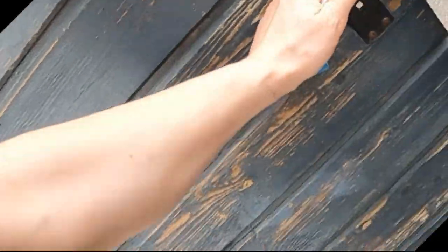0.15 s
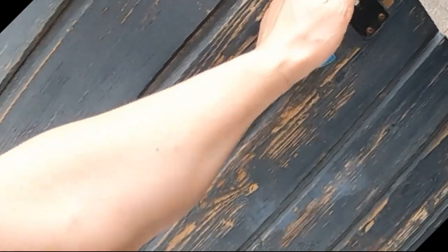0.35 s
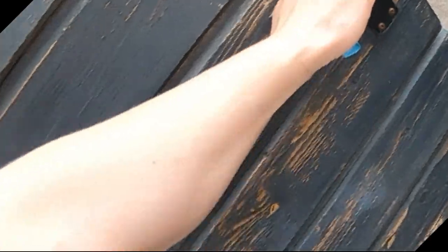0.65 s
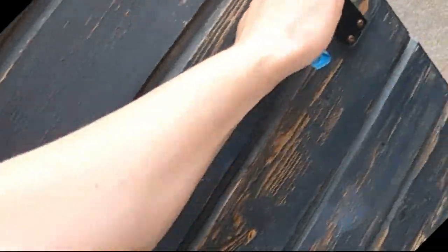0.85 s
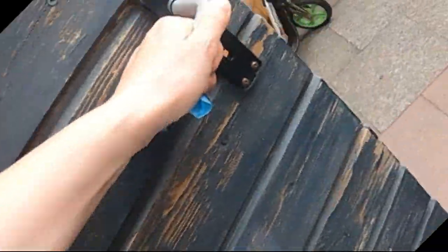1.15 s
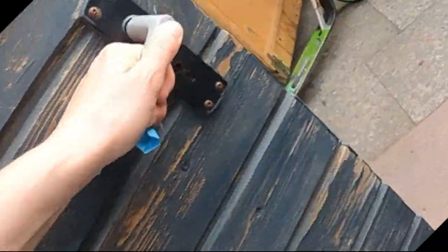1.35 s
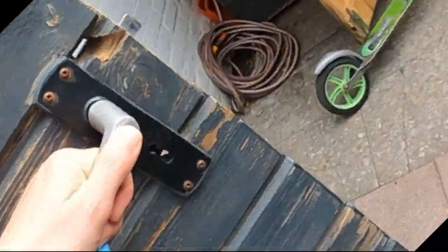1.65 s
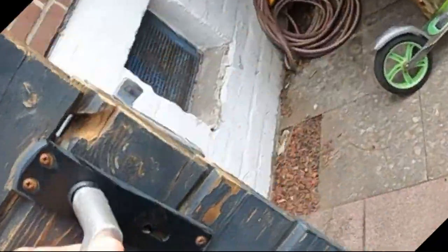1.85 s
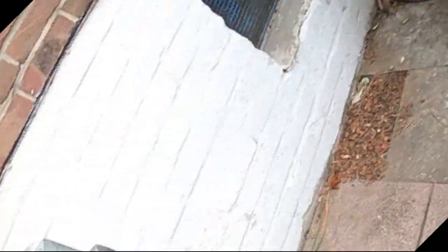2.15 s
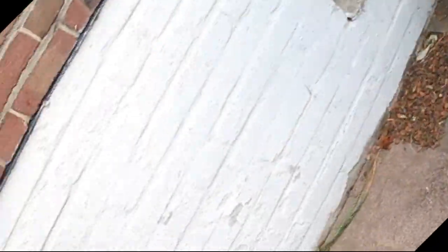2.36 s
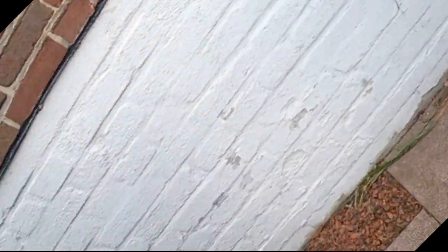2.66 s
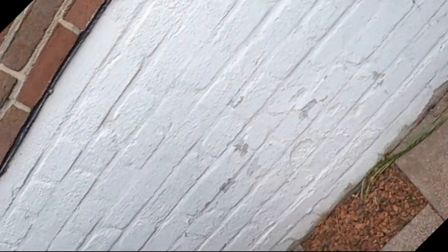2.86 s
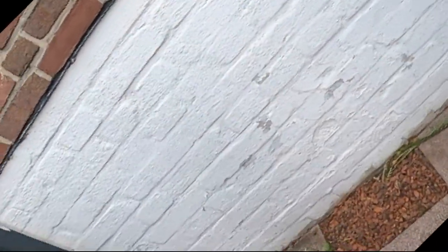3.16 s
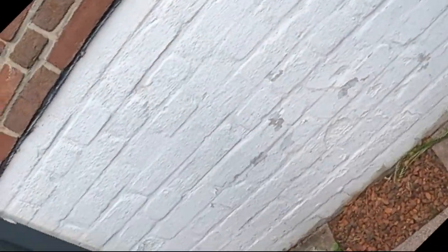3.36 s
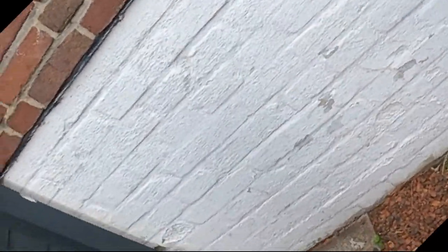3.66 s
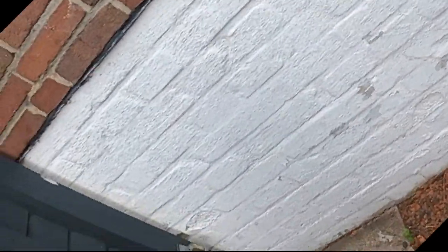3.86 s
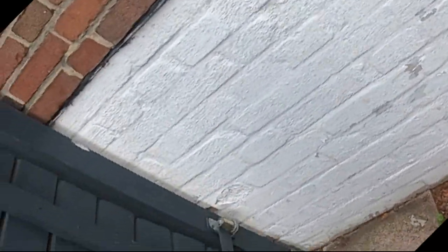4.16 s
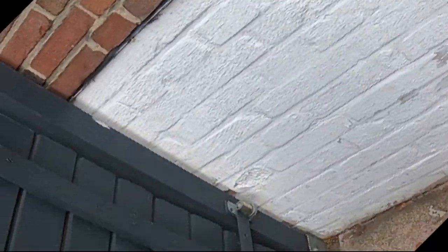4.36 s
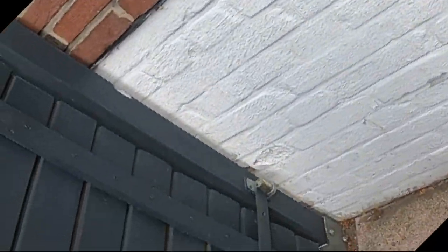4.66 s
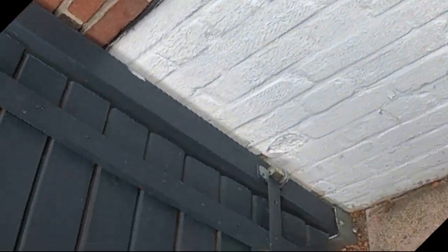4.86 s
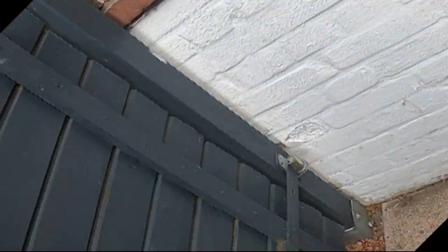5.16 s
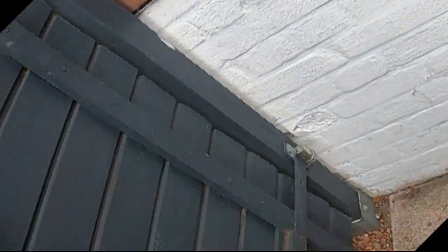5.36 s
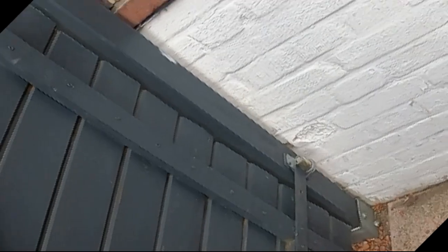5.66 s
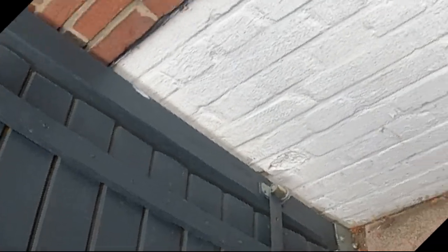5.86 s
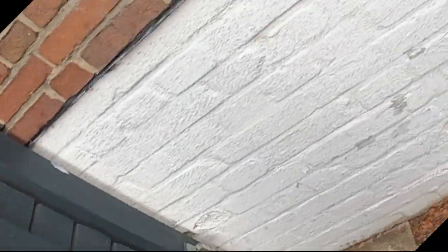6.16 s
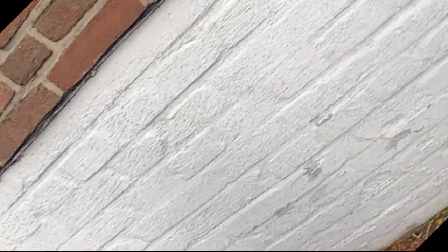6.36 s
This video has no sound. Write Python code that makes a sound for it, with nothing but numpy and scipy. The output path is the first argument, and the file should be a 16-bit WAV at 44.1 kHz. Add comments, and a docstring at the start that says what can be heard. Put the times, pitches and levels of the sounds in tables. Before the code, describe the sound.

Outdoors beside a brick wall, a loose metal latch clatters on a wooden door, pauses with light rubbing and a ticking creak, then clicks hard as the door drags free. Afterwards come isolated clicks, a short low groan, sharp knocks and boomy thumps, with the door rocking in a fading row of bumps. Faint bird chirps and soft low air noise lie behind this close recording.

```python
"""A hand works the lever latch of a wooden shed door close by: knocks ring the lock case over dull panel modes.
The handle creaks by stick-slip, then the latch snaps and the door scrapes free as filtered contact noise.
Later, among more knocks, a bird calls in two gliding voices and the door rocks on its hinges, ever weaker.
Throughout, small birds chirp as swept tones over the noise of garden air; a brick wall returns short echoes."""
import sys
import numpy as np
from scipy import signal
from scipy.io import wavfile

SR = 44100
rng = np.random.default_rng(int(sys.argv[2]) if len(sys.argv) > 2 else 0)


def wrap_up_sound(samples):
    """Save the sound to the file named by the first command line argument, as 16-bit audio."""
    columns = np.atleast_2d(samples).T
    # keep every value between -1 and 1, then stretch to whole-number steps
    tamed = np.clip(columns, -1, 1)
    steps = np.round(tamed * 32767).astype(np.int16)
    wavfile.write(sys.argv[1], SR, steps)


N = 287081
TIME = np.arange(N) / SR  # the whole scene [s]
RING = np.arange(SR // 2) / SR  # half a second for one impact or echo response [s]

# resonances of the lock case and handle plate: (frequency [Hz], width [Hz], gain over broad response [dB])
LOCK_MODES = [(507, 8.7, 5), (585, 15, 2), (749.2, 13, 7), (849, 30, 3), (1220, 40, 4.5), (1310, 21, 2),
              (1420, 27, 5.5), (2000, 21, 2.5), (2136, 42, 5), (2315, 49, 5), (3300, 35, 3), (3925, 16, 4),
              (4215, 52, 4), (4630, 40, 5), (7600, 170, 4), (8355, 270, 8.5)]
# bright rubs of hand and door edge:
# (peak time [s], rise time over 20 dB [s], fall time over 20 dB [s], relative level [dB])
RUB_STROKES = [(.15, .9, 0.28, -62), (.295, 0.355, 0.03, -55.5), (.5, 0.3, 0.37, -60),
               (.71, 0.041, 0.075, -45), (1.1, 1, .6, -66), (1.655, 0.12, 0.043, -49.5),
               (1.94, 0.19, 0.56, -45), (2.06, 0.196, .2, -47.5), (2.17, 0.56, 0.073, -47.5),
               (2.235, 0.12, 0.032, -46.5), (2.55, 0.19, 0.21, -60.5), (3.03, 0.69, 0.052, -62.5),
               (3.6, 0.51, 0.093, -66), (3.88, 0.24, 0.085, -53.5), (4.0, 0.07, 0.18, -47),
               (4.06, 0.051, 0.055, -50), (4.21, 0.16, 0.18, -50.5), (5.65, 0.61, 0.64, -65),
               (5.91, 0.089, 0.066, -54.5)]
# broad response to rubbing: (frequency [Hz], relative level [dB])
RUB_RESPONSE = [(300, -9.5), (1300, -8.5), (2900, 1), (4500, -1.5), (6500, -7), (8500, -12.5),
                (10000, -14.5), (12000, -22.5), (16000, -37.5)]


def knocks(level_db=-10, chatter_db=2.0, chatter_per_s=900, tail_db=-26, tail_t60=0.24, ring_width_hz=80, rise_s=0.0028):
    """Repeated impact: each knock builds for a moment while the loose latch bounces in its case."""
    # wooden knocks with latch chatter: (time [s], bite level [dB], body level [dB], sparkle level [dB],
    # ring frequency [Hz], decay T60 [s], ring gain [dB]); the first three levels are relative
    blows = [(0.0014, -36, -27.5, -56, 568, 0.04, 20), (0.104, -30, -27, -71, 1940, 0.037, 16),
             (0.1265, -48, -35, -85, 475, 0.045, 23), (0.139, -38, -26.5, -90, 1360, 0.028, 6),
             (0.169, -45.5, -35.5, -85, 800, 0.18, 3), (0.466, -63, -37.5, -95, 660, 0.26, 15.5),
             (1.9481, -26, -31, -59, 2570, 0.12, 4), (2.106, -27, -23, -43, 1260, 0.087, 16),
             (2.114, -26, -19.5, -35.5, 770, 0.045, 16), (2.124, -32, -22.5, -56, 508, 0.075, 15),
             (2.13, -34, -22.5, -41, 326, 0.11, 22), (2.7425, -38.5, -32.5, -61.5, 750, 0.11, 21),
             (3.062, -36, -27, -45.5, 736, .096, 13), (3.4796, -34, -19, -76, 750, 0.048, 7),
             (3.4835, -28.5, -35, -72, 2220, 0.019, 21), (3.498, -45, -28, -76, 1200, 0.037, 10),
             (4.056, -32, -45, -49, 2900, 0.074, 22.5), (4.0714, -34, -36.5, -68, 2720, 0.11, 12.5),
             (4.187, -35, -31.5, -85, 514.4, 0.051, 7), (4.22, -33.5, -34, -63, 452, 0.0395, 12),
             (4.3803, -17, -23, -34.5, 4200, 0.035, 13), (4.7124, -46, -36.5, -80.5, 664, 0.1, 9.5),
             (5.0568, -29, -25.5, -39, 3010, 0.095, 12), (5.087, -38.5, -33, -71, 974, 0.22, 9),
             (5.141, -39.5, -30, -57, 379.5, 0.064, 15), (5.197, -37.5, -30.5, -73, 446, 0.045, 16),
             (5.302, -24.5, -28.5, -33.5, 2994, 0.039, -1), (5.329, -27, -29.5, -42.5, 920, 0.051, 10),
             (5.345, -39, -35, -66, 418, 0.14, 8), (5.455, -48.5, -39.5, -72, 463, 0.048, 9),
             (5.489, -38.5, -31, -75, 524, 0.051, 16), (5.7636, -38, -23, -50, 518, 0.18, -6),
             (5.7796, -24, -14, -42, 1333, 0.055, 11.5), (5.7817, -13, -21, -58, 2296, 0.021, 17),
             (5.8111, -24, -24.5, -35.5, 2120, 0.059, 3), (6.1026, -43, -36, -59.5, 840, 0.15, -1)]
    # broad response to knocking: (frequency [Hz], relative level [dB])
    response = [(300, -2.5), (700, -5), (1600, -6.5), (3000, 1.5), (6000, -8), (9500, -6), (12000, -20.5),
                (16000, -48.5)]
    out = np.zeros(N)
    for s, bite, body, sparkle, hz, t60, ring_db in blows:
        decay = dying(t60) + amp(tail_db) * dying(tail_t60)
        swell = (1 - np.exp(-RING / rise_s)) * decay
        force = swell * amp(chatter_db * drift(len(RING), chatter_per_s))
        # chatter leaves the energy of the blow unchanged
        force *= np.linalg.norm(swell) / np.linalg.norm(force) / swell.max()
        modes = LOCK_MODES + [(hz, ring_width_hz, ring_db)]
        add(out, s, strike(force, response, (bite, body, sparkle), modes))
    return amp(level_db) * out


def clicks(level_db=-2, tail_db=-31, tail_t60=0.11, ring_width_hz=600, ring_db=10, below_ring=0.77):
    """Impulsive excitation: metal snaps on metal with a faint shiver; each contact point has its own ring."""
    # sharp metal clicks: (time [s], relative bite level [dB], relative body level [dB],
    # relative sparkle level [dB], ring frequency [Hz], decay T60 [s])
    snaps = [(0.038, -28, -62, -57, 2600, 0.036), (0.6417, -38.5, -55, -50.5, 2500, 0.014),
             (0.6913, -34, -60, -43, 4300, 0.012), (0.9441, -37.5, -47, -47, 4300, 0.043),
             (1.7491, -42, -42.5, -47, 3500, 0.029), (2.0222, -14.5, -19, -14.5, 2650, 0.0081),
             (2.0477, -18.5, -28.5, -24, 2850, 0.0097), (2.1536, -19, -46, -45, 4370, 0.0062),
             (2.1917, -34.5, -36, -38, 1320, 0.03), (2.2563, -48, -32, -52, 930, 0.015),
             (2.435, -41, -61, -55, 2930, 0.015), (2.4542, -41.5, -60, -54, 3170, 0.055),
             (3.7288, -15, -59.5, -30, 2700, 0.0062), (3.7331, -29, -64, -39, 2600, 0.037),
             (3.8122, -41.5, -48.5, -74, 1366, 0.14), (4.452, -39.5, -42, -53.5, 2310, 0.023),
             (5.1819, -44.5, -41, -64, 4022, 0.028), (5.7025, -42, -45.5, -54, 3330, 0.052),
             (6.433, -46, -52.5, -60.5, 3550, 0.049)]
    # broad response to clicking: (frequency [Hz], relative level [dB])
    response = [(300, -7.5), (1000, -2), (2800, 7), (5000, 2), (9500, -9.5), (11200, -21.5), (12200, -18),
                (16000, -48.5)]
    out = np.zeros(N)
    for s, bite, body, sparkle, hz, t60 in snaps:
        force = dying(t60) + amp(tail_db) * dying(tail_t60)
        modes = LOCK_MODES + [(hz, ring_width_hz, ring_db)]
        lowest_hz = np.clip(below_ring * hz, 1800, 5000)
        sound = strike(force, response, (bite, body, sparkle), modes, snap=0.95, bite_from_hz=lowest_hz)
        add(out, s, sound)
    return amp(level_db) * out


def strike(force, response, levels_db, modes, snap=0., bite_from_hz=1800, tilt_share=0.42, neutral_db=13):
    """Source-filter impact: snap and contact chatter ring the lock; hardness sets bite, body and sparkle."""
    contact = force * rng.standard_normal(len(force))
    contact[0] += snap * np.linalg.norm(force)
    bite, _, sparkle = levels_db
    # a soft blow falls off faster towards the treble, in dB an octave above 1500 Hz
    tilt = tilt_share * (sparkle - bite + neutral_db)
    tilted = [(hz, db + tilt * np.log2(max(hz / 1500, 1))) for hz, db in response]
    ring = colour(contact, tilted, modes)
    bands = [(bite_from_hz, 6000), (280, 1800), (6000, 15000)]  # bite, body, sparkle [Hz]
    mixed = sum(amp(db) * unit(band(ring, *b)) for db, b in zip(levels_db, bands))
    return np.sqrt(np.mean(force ** 2)) * mixed


def thumps(leaf_db=-3, plank_db=-4, leaf_t60=0.29, plank_share=0.71):
    """Modal superposition: the whole leaf booms; the planks die sooner."""
    # dull thumps of the leaf: (time [s], relative boom level [dB], relative plank level [dB],
    # nominal boom frequency [Hz])
    blows = [(0.001, -27.5, -28.5, 90.3), (0.038, -24.5, -34.5, 87.6), (0.126, -35, -29, 104.7),
             (0.312, -34.5, -46.5, 100), (0.505, -41.5, -44.5, 104.3), (0.724, -38, -41.5, 104.3),
             (0.774, -35.5, -62, 95), (0.945, -38, -44.5, 95.8), (0.992, -36, -56, 92),
             (1.461, -54, -47, 68), (1.629, -41, -39.5, 67.4), (1.76, -41.5, -47.5, 73),
             (1.985, -51, -45.5, 98.5), (2.122, -55, -34.5, 66.4), (2.659, -65, -41, 67.5),
             (3.073, -49, -35.5, 73.6), (3.479, -29.5, -29.5, 79.2), (3.541, -43.5, -34.5, 92),
             (3.828, -32, -33, 75), (4.196, -35, -31.5, 75), (4.383, -25.5, -33, 78.1),
             (5.055, -32, -30, 66.3), (5.141, -44, -33, 89.4), (5.494, -42, -40, 92),
             (5.784, -26, -30, 81.4), (5.826, -26, -47, 88), (6.066, -35.5, -50, 95.9),
             (6.104, -34, -40, 82)]
    # flexing of the leaf: (multiple of the boom frequency [1], relative level [dB])
    leaf = [(.64, -11), (1.002, 1), (1.37, -14)]
    # plank modes: (nominal frequency [Hz], relative level [dB])
    planks = [(146, -0.5), (188, 2), (232, 3.5), (252, 2.5), (283, 3.5), (345, -6), (430, -7)]
    out = np.zeros(N)
    multiples, leaf_modes_db = np.transpose(leaf)
    plank_hz, plank_modes_db = np.transpose(planks)
    for s, boom, plank, hz in blows + rocking():
        flexing = wood(hz * multiples, leaf_modes_db, leaf_t60, rise=0.0032, detune=0.067)
        add(out, s, amp(boom + leaf_db) * flexing)
        plank_ring = wood(plank_hz, plank_modes_db, leaf_t60 * plank_share, rise=0.0043, detune=0.06)
        add(out, s, amp(plank + plank_db) * plank_ring)
    return out


def rocking(count=4, start_s=5.134, period_s=.101, boom_hz=97.2, boom_db=-28, plank_db=-37, loss_db=0.9):
    """Damped oscillation: the open door rocks on its hinges in evenly spaced, weakening bumps."""
    return [(start_s + k * period_s, boom_db - k * loss_db, plank_db - k * loss_db, boom_hz)
            for k in range(count)]


def wood(hz, db, t60, rise, detune):
    """Damped low modes of the door, pushed from rest, a little different at every point of impact."""
    hz = hz * (1 + detune * rng.uniform(-0.92, 1, len(hz)))
    ring = amp(db) @ np.sin(2 * np.pi * hz[:, None] * RING)
    swell = (1 - np.exp(-RING / rise)) * dying(t60)
    return unit(ring * swell) * np.sqrt(np.mean(swell ** 2)) / swell.max()


def creak(level_db=-3, uneven_db=1.2, slip_rise_s=0.0009):
    """Stick-slip: the spindle judders quickly as the lever starts to turn, then sticks and slips more slowly."""
    # single slips: (time [s], relative level [dB])
    slow_slips = [(0.977, -46), (0.987, -48), (1.012, -54), (1.106, -49), (1.126, -37), (1.135, -42),
                  (1.162, -43), (1.192, -45.5), (1.218, -47.5), (1.243, -51), (1.264, -49), (1.292, -49)]
    # short ring of the spindle: (nominal frequency [Hz], relative level [dB])
    spindle = [(480, -5.5), (950, -11), (1950, -1), (2350, 0), (3800, -12.5), (5200, -11)]
    judder_start_s, judder_length_s, judder_per_s, judder_db = .79, .09, 127, -50
    out = np.zeros(N)
    hz, db = np.transpose(spindle)
    t = RING[:SR // 50]
    swell = t / slip_rise_s * np.exp(1 - t / slip_rise_s)
    judder = [(judder_start_s + s, judder_db) for s in np.arange(0, judder_length_s, 1 / judder_per_s)]
    for s, slip_db in judder + slow_slips:
        slip_hz = hz * rng.uniform(0.88, 1.1, len(hz))
        ring = amp(db) @ np.sin(2 * np.pi * np.outer(slip_hz, t))
        gain = amp(slip_db + level_db + uneven_db * rng.standard_normal())
        add(out, s, gain * unit(ring) * swell)
    return out


def handling(rub_db=-2.0, shuffle_db=-1, tremble_db=-3, scrape_tremble_db=-3.5, sway_db=1):
    """Sliding friction: rubs hiss, scrapes ring lock and planks, and the door trembles and sways in the hand."""
    # force of the hand on the door: (time [s], relative level [dB])
    push_points = [(0, -35.5), (.35, -51), (1.0, -52), (1.35, -57), (1.6, -49), (1.9, -64), (2.2, -47.5),
                   (2.5, -73.5), (2.87, -59), (3.03, -48), (4.35, -49), (4.7, -59), (5.02, -65.5),
                   (5.08, -38.5), (5.4, -48.5), (5.8, -49.5), (6.51, -64)]
    # dull scrapes of the moving door and of shuffling:
    # (peak time [s], rise time over 20 dB [s], fall time over 20 dB [s], relative level [dB])
    scrape_strokes = [(.02, 0.28, 0.27, -43.5), (.7, 0.2, 0.41, -55), (1.3, 0.99, 1, -64.5),
                      (1.62, 0.1, 1, -57), (2.1, 0.71, 0.54, -50), (2.55, .4, 1, -61.5),
                      (3.05, 0.44, 0.33, -45.5), (3.6, 0.93, 0.46, -52.5), (4.28, 0.55, 0.41, -56.5),
                      (4.75, 0.33, 0.55, -63.5), (5.33, 0.27, 0.55, -56.5), (5.75, 0.23, 0.35, -51),
                      (6.45, 0.52, 0.77, -62)]
    # broad responses: (frequency [Hz], relative level [dB])
    shuffle_response = [(200, -17), (430, -1), (700, -5.5), (1000, 0.5), (1600, -6.5), (2400, -7),
                        (3300, -14.5), (7000, -33), (12000, -78.5)]
    tremble_response = [(90, -30), (150, -2), (195, 0), (240, 0.5), (300, -6.5), (400, -12.5), (700, -19),
                        (1500, -68.5)]
    sway_response = [(12, -6), (22, -7.5), (34, 8.5), (55, -1), (88, 5.5), (125, -5), (200, -29),
                     (500, -90.5)]
    push = amp(np.interp(TIME, *np.transpose(push_points)))
    scrape = strokes(scrape_strokes)
    shake = np.hypot(amp(tremble_db) * push, amp(scrape_tremble_db) * scrape)
    rub = friction(strokes(RUB_STROKES), RUB_RESPONSE, grain_db=2.5, grains_per_s=260, modes=LOCK_MODES)
    shuffle = friction(scrape, shuffle_response, grain_db=3.0, grains_per_s=190, modes=LOCK_MODES)
    tremble = friction(shake, tremble_response, grain_db=4.0, grains_per_s=59)
    sway = friction(push, sway_response, grain_db=1, grains_per_s=63)
    return amp(rub_db) * rub + amp(shuffle_db) * shuffle + tremble + amp(sway_db) * sway


def friction(strength, response, grain_db, grains_per_s, modes=()):
    """Random excitation: uneven grains of contact ring a surface, following the strength of the stroke."""
    grains = rng.standard_normal(N) * amp(grain_db * drift(N, grains_per_s))
    return unit(colour(grains, response, modes)) * strength


def strokes(rows, range_db=20):
    """Contact strength: each stroke changes by range_db per rise or fall time, and powers add."""
    power = np.zeros(N)
    for s, rise, fall, db in rows:
        steps_from_peak = np.maximum((s - TIME) / max(rise, .01), (TIME - s) / max(fall, .01))
        power += amp(db - range_db * steps_from_peak) ** 2
    return np.sqrt(power)


def grit(level_db=-6, ticks_per_s=110, spread_db=13):
    """Sparse impulses: specks of rust and paint snap under each rub and tick the lock plate."""
    struck = rng.random(N) < ticks_per_s / SR
    ticks = struck * rng.choice([-1., 1.], N) * amp(spread_db * rng.random(N))
    return amp(level_db) * unit(colour(ticks, RUB_RESPONSE, LOCK_MODES)) * strokes(RUB_STROKES)


def squeaks(level_db=0):
    """Resonant friction: rubbing edges and hinges feed one narrow resonance for the length of a stroke."""
    # faint squeaks and groans: (time [s], length [s], centre frequency [Hz], width [Hz], level [dB])
    tones = [(0.293, 0.24, 2120, 130, -65.5), (3.795, .135, 257, 106, -37), (2.726, 0.063, 710, 159, -54.5),
             (2.848, 0.59, 247, 40, -49), (3.099, 0.5, 2460, 200, -63), (3.991, 0.063, 2800, 500, -50.5),
             (4.268, 0.13, 1500, 800, -53.5), (5.531, 0.12, 300, 70, -51.5),
             (6.259, 0.091, 1460, 900, -58.5)]
    out = np.zeros(N)
    for s, length, hz, width, db in tones:
        noise = rng.standard_normal(SR)
        tone = band(noise, hz - width / 2, hz + width / 2)[-int(length * SR):]  # the settled end
        add(out, s, amp(db + level_db) * unit(tone) * signal.windows.tukey(len(tone), .6))
    return out


def birds(chirps_db=-2, call_db=-1, overtone_db=-30, chirp_waver=0.039, trill_waver=0.071, rasp_hz=960):
    """Frequency modulation: rising, falling, arched and buzzing far chirps, and a louder two-voice call."""
    # chirps of four kinds: (time [s], length [s], middle frequency [Hz], relative level [dB])
    rising = [(.065, 0.047, 3624, -51.5), (.118, 0.046, 4230, -50.5), (.89, 0.052, 3280, -60),
              (.93, 0.067, 4023, -50.5), (1.76, 0.085, 3800, -55.5), (2.385, 0.088, 2405, -59.5),
              (2.57, 0.08, 3910, -56.5), (3.343, 0.1006, 3880, -60), (5.0, 0.087, 3690, -58.5)]
    falling = [(.588, 0.047, 3820, -60), (1.271, 0.045, 3580, -59.5), (1.354, 0.035, 3800, -58),
               (1.445, 0.055, 3716, -60.5), (4.615, 0.038, 4250, -58)]
    arched = [(4.566, 0.062, 4860, -58.5), (4.68, 0.0534, 3540, -59)]
    buzzing = [(1.102, 0.0295, 5367, -64), (1.145, .06, 5360, -63.5)]
    # the nearest bird sings with both sides of its syrinx: (time [s], frequency [Hz], relative level [dB])
    main_voice = [(4.835, 2770, -61.5), (4.871, 3010, -45), (4.883, 3830, -49), (4.888, 4680, -36),
                  (4.897, 4680, -46), (4.900, 4000, -49), (4.909, 4030, -37), (4.914, 3150, -40.5),
                  (4.924, 2870, -44), (4.934, 3560, -35.5), (4.943, 3500, -41), (4.953, 3110, -38),
                  (4.966, 2900, -46), (4.980, 2660, -66)]
    upper_voice = [(4.835, 5550, -62), (4.857, 5680, -55.5), (4.877, 6020, -64)]
    out = np.zeros(N)
    # start and end pitch are multiples of the middle pitch
    kinds = ((rising, (0.93, 1.2), chirp_waver), (falling, (1.13, 0.85), chirp_waver),
             (arched, (.92, 1), chirp_waver), (buzzing, (1.2, 1), trill_waver))
    for chirps, (first, last), waver in kinds:
        for s, length, middle_hz, db in chirps:
            u = np.linspace(0, 1, int(length * SR))
            parabola = np.polyfit([0, .5, 1], [first, 1, last], 2)
            hz = middle_hz * np.polyval(parabola, u)
            note = whistle(hz, waver, flutter_db=1.5) * signal.windows.tukey(len(u), .5)
            add(out, s, amp(db + chirps_db) * note)
    for contour, waver, rasp_depth in ((main_voice, .028, .2), (upper_voice, .018, .7)):
        s, hz, db = np.transpose(contour)
        t = np.arange(s[0], s[-1], 1 / SR)
        hz = np.interp(t, s, hz)
        voice = whistle(hz, waver, flutter_db=2.5)
        overtone = whistle(2 * hz, waver, flutter_db=2.5)
        rasp = 1 + rasp_depth * np.sin(2 * np.pi * rasp_hz * t)
        level = amp(np.interp(t, s, db) + call_db)
        add(out, s[0], level * rasp * (voice + amp(overtone_db) * overtone))
    return out


def whistle(hz, waver, flutter_db):
    """Phase integration: a gliding note, slightly rasping from random pitch and level modulation."""
    phase = 2 * np.pi * np.cumsum(hz * (1 + waver * drift(len(hz), 900))) / SR
    return unit(np.sin(phase) * amp(flutter_db * drift(len(hz), 225)))


def echoes(x, t60, delay, top_hz):
    """Convolution with sparse, decaying reflections from walls and paving."""
    reflected = (rng.random(len(RING)) < 2000 / SR) * (RING > delay)
    taps = rng.choice([-1., 1.], len(RING)) * reflected * dying(t60)
    taps = band(taps, 160, top_hz)
    return signal.fftconvolve(x, taps / np.linalg.norm(taps))[:N]


def garden_air(level_db=-64):
    """Stationary filtered noise: the steady air of the garden."""
    # spectrum of the air: (frequency [Hz], relative level [dB])
    spectrum = [(18, -29), (30, -3.5), (81, 1.5), (134, 2.5), (245, -4.5), (355, -14.5), (616, -26),
                (913, -33), (1010, -10), (1540, -21), (3980, -20.5), (8520, -29.5), (16000, -63.5)]
    return amp(level_db) * unit(colour(rng.standard_normal(N), spectrum))


def amp(db):
    """Logarithmic level: decibels to gain."""
    return 10 ** (np.asarray(db) / 20)


def unit(x):
    """Normalization by mean power: scales to rms 1."""
    return x / np.sqrt(np.mean(x ** 2) + 1e-20)


def add(mix, s, sound):
    """Linear superposition: mixes a sound in place at time s [s]."""
    part = mix[max(round(s * SR), 0):][:len(sound)]
    part += sound[:len(part)]


def read(points, hz):
    """Interpolation of a spectrum in dB on a log-frequency axis."""
    f, db = np.transpose(points)
    return np.interp(np.log(hz + 1), np.log(f + 1), db)


def colour(x, points, modes=()):
    """Minimum-phase filtering: a causal filter with a broad response and resonant peaks."""
    size = 16384
    hz = abs(np.fft.fftfreq(size, 1 / SR))
    peaks = sum((amp(db) - 1) / (1 + (2 * (hz - f) / w) ** 2) for f, w, db in modes)
    gain = amp(read(points, hz)) * (1 + peaks)
    # the Hilbert transform of the log gain supplies the phase
    log_response = np.conj(signal.hilbert(np.log(np.maximum(gain, 1e-5))))
    taps = np.fft.ifft(np.exp(log_response)).real
    return signal.fftconvolve(x, taps[:size // 2])[:len(x)]


def band(x, lo_hz, hi_hz):
    """Band-pass filtering with maximally flat passband."""
    edges_hz = [lo_hz, min(hi_hz, SR / 2 - 1)]
    return signal.sosfilt(signal.butter(3, edges_hz, "band", fs=SR, output="sos"), x)


def dying(t60):
    """Exponential damping: decay by 60 dB in t60 seconds."""
    return np.exp(-np.log(1000) * RING / max(t60, 1e-3))


def drift(count, per_s):
    """Slow chance: random knots joined by straight lines, at rms 1."""
    knots = rng.standard_normal(int(count / SR * per_s) + 2)
    return unit(np.interp(np.arange(count) / SR * per_s, np.arange(len(knots)), knots))


def scene():
    """Superposition: the door close by and the birds across the garden, all from straight ahead."""
    door = clicks() + knocks() + thumps() + creak() + grit()
    song = birds()
    near = door + amp(-16.0) * echoes(door, t60=0.16, delay=0.0042, top_hz=8000)
    far = song + amp(-8.5) * echoes(song, t60=0.1, delay=0.004, top_hz=8980)
    return np.tile(near + far + handling() + squeaks() + garden_air(), (2, 1))


def record(dry, peak_hz=12200, peak_q=14, peak_gain=0.33, edge_hz=15900):
    """Linear filtering: a narrow peak near 12 kHz lifts the right channel's top treble, then both are low-passed."""
    peak = signal.lfilter(*signal.iirpeak(peak_hz, peak_q, fs=SR), dry[1])
    pair = np.array([dry[0], dry[1] + peak_gain * peak])
    low_pass = signal.firwin(511, edge_hz, window=("kaiser", 9), fs=SR)
    return signal.oaconvolve(pair, low_pass[None], "same")


dry = scene()
out = record(dry)
wrap_up_sound(out)
```